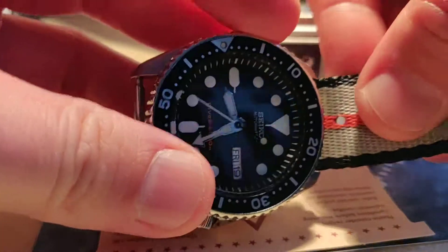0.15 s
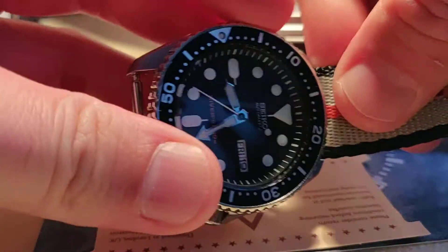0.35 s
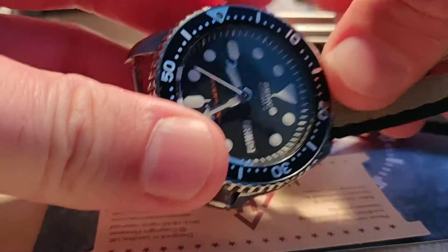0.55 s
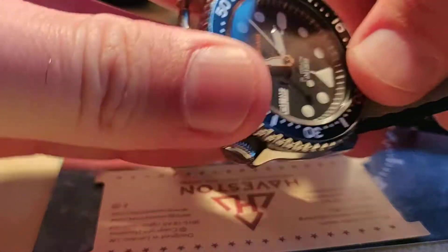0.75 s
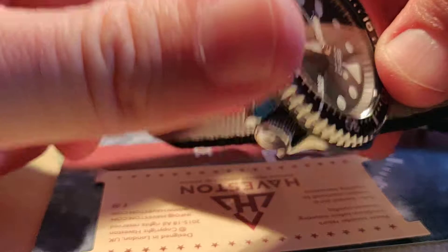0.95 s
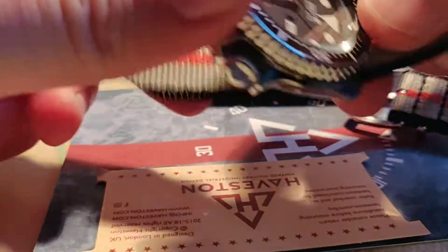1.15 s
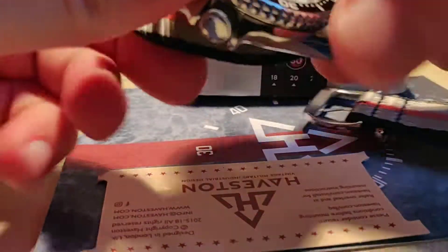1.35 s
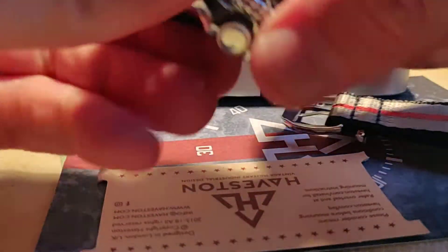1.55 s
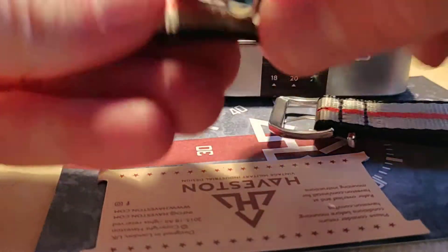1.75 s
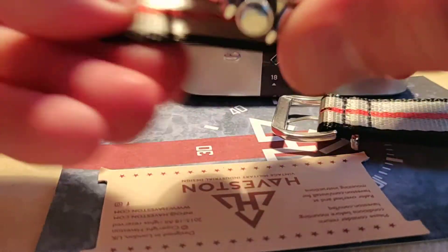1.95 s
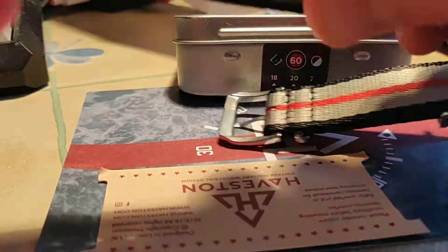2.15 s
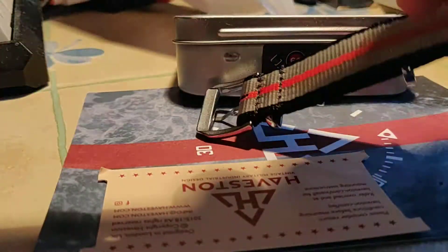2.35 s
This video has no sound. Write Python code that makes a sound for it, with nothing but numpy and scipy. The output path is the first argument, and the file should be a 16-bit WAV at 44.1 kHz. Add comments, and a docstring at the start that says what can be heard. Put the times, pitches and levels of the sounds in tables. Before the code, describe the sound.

A hard hollow metal knock, lighter clacks and finger rubs, then a ribbed fabric strap purring through

```python
"""Steel watch parts snap and knock together in the hands, ringing the case and the hollow of the hands.
Each blow sums decaying modes and a noise crack; finger strokes drive similar modes with trains of tiny slips.
Small fittings tick, the buckle clinks, fingers bump and squeak, and cloth slides as filtered noise.
At the end the ribbed nylon strap is pulled through: its ribs make a low harmonic purr under a hiss.
All is close, with short echoes and a faint tail, over quiet air and a low wavering hum."""
import sys
import numpy as np
from scipy import signal
from scipy.fft import rfft, irfft
from scipy.io import wavfile

SR = 44100
rng = np.random.default_rng(int(sys.argv[2]) if len(sys.argv) > 2 else 0)


def waveform_to_disk(signal):
    """Save audio, clipped to [-1, 1], as 16-bit WAV at the path in sys.argv[1]."""
    frames = np.transpose(np.atleast_2d(signal))
    scaled = np.clip(frames, -1, 1) * 32767
    samples = np.round(scaled).astype(np.int16)
    wavfile.write(sys.argv[1], SR, samples)


N = 110250
T = np.arange(N) / SR  # time (s)

# Quiet air of the room. Each row: frequency in Hz, relative level in dB.
AIR_SPECTRUM = [(20, -12.5), (55, -7.5), (169, -4.5), (313, -6), (741, -13.5), (945, -18.5), (2920, -34.5),
                (6380, -36), (15500, -29)]
AIR_DB, HUM_HZ, HUM_DB = -63, 92.5, -69.5
HUM_WAVER_HZ, HUM_WAVER_RATE_HZ = 2.5, 10  # rms pitch deviation and how fast it wanders

# Cloth sliding over skin and steel. Each row: time in seconds, level in dB.
SLIDE = [(0, -65), (.52, -68), (.538, -53.5), (.56, -63.5), (1.12, -67), (1.24, -57.5), (1.29, -50.5),
         (1.35, -50.5), (1.39, -61.5), (1.5, -72), (1.545, -60.5), (1.58, -72.5), (1.69, -60),
         (1.72, -66.5), (2.0, -69)]
# Spectrum of the sliding weave. Each row: frequency in Hz, relative level in dB.
CLOTH_SPECTRUM = [(200, -5), (850, 0), (2200, 3), (3500, 1), (6600, 1.5), (10000, -7), (15000, 5.5)]
WEAVE_SNAGS_PER_S, SNAG_SPREAD_DB = 450, 3.5  # threads catch and let go
# The strap is pulled through. Each row: time in seconds, ribs per second, purr in dB, hiss in dB.
PULL = [(1.921, 52.6, -70.5, -72.5), (1.972, 65, -57.5, -65.5), (1.997, 116, -50, -63),
        (2.032, 156, -50.5, -53.5), (2.07, 183, -53.5, -55), (2.116, 120, -48.5, -51.5),
        (2.16, 144, -48, -54.5), (2.2, 115, -48, -52), (2.243, 88, -48, -59), (2.281, 125, -48, -56.5),
        (2.355, 104, -48.5, -54.5), (2.386, 56.5, -56.5, -62), (2.422, 125, -47.5, -53.5),
        (2.454, 170, -47, -53), (2.5, 89, -50, -55.5)]
RIB_HARMONICS_DB = [6.5, -0.5, -19.5, -33]  # relative levels from the fundamental upward
RIB_JITTER, RIB_GATING = 0.061, 0.2  # rms share of the rib rate; depth of the hiss modulation
PURR_PAN_DB = 15  # left over right

# Light ticks of buckle and keepers. Each row: start in seconds, level in dB, tilt in dB per octave.
TICKS = [(0.2025, -51, 4), (0.8567, -44.5, 0), (1.4005, -48, 0.5), (2.0445, -45, 2), (2.052, -46, 0),
         (2.0632, -37, -6), (2.1455, -41, -.5), (2.335, -40.5, 6)]
# Spectrum of a tick. Each row: frequency in Hz, relative level in dB.
TICK_SPECTRUM = [(200, -3.5), (900, -10), (2000, 9.5), (3500, 0.5), (6000, 8), (8000, 2), (10500, -10.5),
                 (15000, -2.5)]
TICK_T60_S, TICK_PULSE_DB = 0.014, 8  # pulse peak relative to the rattle

# Knocks on the case. Each row: start in seconds, hollow ring in dB, steel ring in dB, crack in dB,
# hollow pitch in Hz.
KNOCKS = [(0.2324, -5.5, -17.5, -18, 863), (0.327, -43.5, -48.5, -57.5, 808), (0.3849, -47, -55, -59, 785),
          (0.4212, -33, -43.5, -47, 845), (0.6733, -21.5, -50, -34, 846.5), (0.7269, -26.5, -46, -39, 837),
          (0.7804, -44, -55, -53, 895), (0.818, -39.5, -59, -52.5, 924), (0.9045, -25.5, -46.5, -46, 859),
          (0.9610, -32, -49.5, -48, 898), (1.0945, -37.5, -51.5, -59, 796), (1.4004, -53, -75, -53.5, 888),
          (2.0630, -43, -45.5, -66, 903)]
# Modes of the steel case. Each row: frequency in Hz, relative level in dB, left minus right in dB.
STEEL_MODES = [(1245, 2, -4), (1610, -1, -2), (1770, 4, -2), (1896, -4, 0), (2158, 0, 3), (2250, -3, 2),
               (2573, -3, 0), (2905, -4, 0), (3255, -2, -6), (3920, -5, 0), (4255, -5, 0), (5405, -7, 5),
               (6130, -6, 3), (6612, -9, 0), (8300, -10.5, -14)]
STEEL_T60_S, STEEL_DAMPING = 0.068, 0.3  # t60 of the lowest mode; exponent of its fall with frequency
STEEL_WAVER, STEEL_WAVER_HZ = 0.008, 150  # rms share of the pitch; how fast it wanders
STRIKE_SPREAD_DB = 1.2  # chance in each mode's level
HOLLOW_RISE_S, HOLLOW_SHAPE = 0.0038, 2.3  # time to the peak; exponent that narrows the pulse
HOLLOW_SAG, HOLLOW_SETTLE_S = 0.11, 0.0039  # the hollow starts flat and settles on its pitch
# The longer, weaker ring of the hollow, relative to the main pulse.
AFTER_HZ, AFTER_DB, AFTER_T60_S, AFTER_RISE_S = 902, -7.5, 0.089, 0.012
# The hollow keeps fluttering as the parts settle.
FLUTTER_DB, FLUTTER_T60_S, FLUTTER_WIDTH_HZ = -28.5, 0.2, 100
# Side modes of the hollow. Each row: frequency in Hz, relative level in dB, t60 in seconds.
SIDE_MODES = [(675, -17, 0.056), (1168, -21.5, 0.092)]
# Spectrum of the crack. Each row: frequency in Hz, relative level in dB.
CRACK_SPECTRUM = [(60, -24), (260, 1), (560, -9), (850, 11), (1500, -0.5), (2100, 3.5), (4400, -1),
                  (6000, -6.5), (10000, -15), (15000, -4)]
CRACK_T60_S = 0.061
RATTLE_DB, RATTLE_GRAIN_DB = -23, 4  # level relative to the crack; rms unevenness
SOFT_TILT, SOFT_STEEL_TILT = 0.079, 0.32  # softer blows are duller (dB per octave for each dB)

# Finger strokes on the metal. Each row: start in seconds, length in seconds, hollow ring in dB,
# scrape in dB, hollow pitch in Hz; levels hold before the stroke's swell.
RUBS = [(0.531, 0.094, -47, -65.5, 835), (0.694, 0.046, -43, -61.5, 863), (0.787, 0.11, -51.5, -64, 822),
        (1.083, 0.041, -46.5, -69, 837), (1.147, 0.076, -46, -66.5, 846), (1.262, 0.068, -40.5, -60.5, 807),
        (1.309, 0.074, -46.5, -57, 766)]
RUB_WIDTH_HZ, SLIPS_PER_S, SLIP_SPREAD_DB = 117, 900, 1.5
RUB_STEEL_DB, RUB_SIDE_DB = -1.5, -10  # steel relative to the scrape; side modes to the hollow
RUB_STEEL_TILT_DB = -0.5  # rubbing wakes the high modes less (dB per octave)
STROKE_SHAPE = 0.61  # exponent of the half-sine swell

# Clinks of the loose buckle. Each row: start in seconds, frequency in Hz, level in dB.
CLINKS = [(0.6735, 4760, -41), (0.674, 1310, -42.5), (0.728, 1237, -41.5), (0.906, 1820, -45.5),
          (1.401, 2200, -60), (2.185, 2355, -50.5)]
CLINK_T60_S = 0.053

# Soft bumps of the fingers. Each row: start in seconds, level in dB before the swell, length in seconds.
BUMPS = [(0.842, -53.5, 0.042), (1.341, -64.5, 0.25), (2.042, -48.5, 0.04), (2.121, -49, 0.048)]
# Dull spectrum of bumps and of the purr's buzz. Each row: frequency in Hz, relative level in dB.
DULL_SPECTRUM = [(130, -3), (300, 4), (550, -7), (900, -4.5), (1500, -31)]

# Squeak as the fingers rub. Each row: time in seconds, top pitch in Hz, level in dB.
SQUEAK = [(1.262, 8150, -78), (1.289, 8420, -63), (1.328, 8680, -64.5), (1.351, 8300, -67),
          (1.372, 7800, -85)]
# Partials of the squeak. Each row: share of the top pitch as a ratio, relative level in dB.
SQUEAK_PARTIALS = [(1, -6), (0.68, -3), (0.51, -2), (0.41, -4.5), (.385, -2)]
SQUEAK_WIDTH_HZ, SQUEAK_PAN_DB = 65, -5.5

# A hiss that swells steeply with the speed of the strap; its level is that at full speed.
ZIP_HZ, ZIP_WIDTH_HZ, ZIP_DB, ZIP_POWER = 6250, 800, -63.5, 3.7

# Decay of the late tail. Each row: frequency in Hz, t60 in seconds.
TAIL_T60 = [(200, .3), (900, 0.26), (3000, 0.24), (7000, 0.35), (15000, 0.52)]
TAIL_DB, EARLY_DB, EARLY_T60_S = -18, -10, 0.06
# Colour of the two microphone ports. Each row: frequency in Hz, left in dB, right in dB.
PORTS = [(1000, 0, 0), (2150, 2, -2.5), (3200, -5, 0), (5100, -1, -3.5), (6730, 3, -4), (8300, -4, 3.5),
         (9800, -3.5, -1.5), (15400, -11.5, -11.5)]
EDGE_HZ = 15900  # band limit


def amp(db):
    """Logarithmic level: decibels to amplitude gain."""
    return 10 ** (np.asarray(db) / 20)


def evened(x):
    """Normalisation: scales to an rms of one."""
    return x / np.sqrt(np.mean(x ** 2) + 1e-20)


def pan(db):
    """Level-difference panning: left and right gains."""
    return amp(np.array([[db / 2], [-db / 2]]))


def read(points, hz):
    """Interpolation of a table on a log-frequency axis."""
    f, value = np.transpose(points)
    return np.interp(np.log(hz + 1), np.log(f), value)


def colour(x, points, tilt_db=0):
    """Minimum-phase filtering with a given spectrum, tilted per octave about 4 kHz."""
    hz = abs(np.fft.fftfreq(4096, 1 / SR))
    tilt = tilt_db * np.log2(np.maximum(hz, 800) / 4000)
    log_gain = np.log(amp(read(points, hz) + tilt))
    # The Hilbert transform of the log gain supplies the phase of a causal filter.
    response = np.exp(np.conj(signal.hilbert(log_gain)))
    taps = np.fft.ifft(response).real[:2048]
    return signal.fftconvolve(x, taps[None], axes=1)[:, :x.shape[1]]


def add(mix, s, sound):
    """Superposition: mixes a sound in at a time in seconds."""
    part = mix[:, max(round(s * SR), 0):][:, :sound.shape[1]]
    part += sound[:, :part.shape[1]]


def drift(hz, size=N):
    """Slow random wander: white noise under a Gaussian low-pass."""
    spectrum = rfft(rng.standard_normal(size))
    low_pass = np.exp(-(np.fft.rfftfreq(size, 1 / SR) / hz) ** 2)
    return evened(irfft(spectrum * low_pass, size))


def noise(points, size=N, tilt_db=0):
    """Coloured noise, uncorrelated in the two ports."""
    return evened(colour(rng.standard_normal((2, size)), points, tilt_db))


def slips(per_s, spread_db):
    """Stick-slip friction as random impulses of uneven size and either sign."""
    sizes = amp(spread_db * np.minimum(rng.exponential(1, N), 4))
    signs = rng.choice([-1, 1], N)
    return sizes * signs * (rng.random(N) < per_s / SR)


def fuzzy(turn, width_hz):
    """Narrow-band noise: two random envelopes in quadrature follow a phase curve."""
    in_phase = drift(width_hz, size=len(turn)) * np.cos(turn)
    quadrature = drift(width_hz, size=len(turn)) * np.sin(turn)
    return in_phase + quadrature


def room_tone(shared=0.26):
    """Partly correlated noise is the air; frequency modulation makes the low hum waver."""
    air = noise(AIR_SPECTRUM)
    air = evened(air + shared * air[::-1])
    pitch = HUM_HZ + HUM_WAVER_HZ * drift(HUM_WAVER_RATE_HZ)
    hum = evened(np.sin(2 * np.pi * np.cumsum(pitch) / SR))
    return amp(AIR_DB) * air + amp(HUM_DB) * hum * pan(2)


def strap(grit_share=0.73, jitter_hz=60, patchy_db=2, patch_hz=60, uneven_db=2, uneven_hz=45, buzz_db=-12):
    """Friction makes the weave hiss; periodic passage of uneven ribs over the bar makes it purr."""
    s, rate, purr_db, hiss_db = np.transpose(PULL)
    rib_rate = np.interp(T, s, rate) * (1 + RIB_JITTER * drift(jitter_hz))
    turn = 2 * np.pi * np.cumsum(rib_rate) / SR
    ribs = 0
    for k, db in enumerate(RIB_HARMONICS_DB):
        ribs = ribs + amp(db + uneven_db * drift(uneven_hz)) * np.cos((k + 1) * turn)
    purr = evened(ribs) * amp([[0], [-PURR_PAN_DB]]) + amp(buzz_db) * noise(DULL_SPECTRUM)
    purr = purr * amp(np.interp(T, s, purr_db, left=-120))
    snags = np.array([slips(WEAVE_SNAGS_PER_S, SNAG_SPREAD_DB) for port in range(2)])
    grit = evened(colour(snags, CLOTH_SPECTRUM))
    weave = evened(noise(CLOTH_SPECTRUM) + grit_share * grit)
    pulled = amp(np.interp(T, s, hiss_db, left=-120) + patchy_db * drift(patch_hz))
    pulled = pulled * (1 + RIB_GATING * np.cos(turn))
    sliding = amp(np.interp(T, *np.transpose(SLIDE)))
    return purr + weave * (pulled + sliding)


def ticks():
    """Impulsive contact of small fittings: one sharp pulse and a short noise rattle."""
    out, t = np.zeros((2, N)), T[:SR // 10]
    for s, db, tilt_db in TICKS:
        pulse = colour(np.tile(t == 0, (2, 1)) * 1., TICK_SPECTRUM, tilt_db)
        pulse = amp(TICK_PULSE_DB) * pulse / abs(pulse).max()
        rattle = noise(TICK_SPECTRUM, size=len(t), tilt_db=tilt_db) * amp(-60 * t / TICK_T60_S)
        add(out, s, amp(db) * (rattle - pulse))
    return out


def steel_ring(t, tilt_db):
    """Modal decay: higher modes die sooner, and the grip of the fingers makes each one waver."""
    out, lowest = 0, STEEL_MODES[0][0]
    for (hz, db, side), chance in zip(STEEL_MODES, rng.standard_normal(len(STEEL_MODES))):
        t60 = STEEL_T60_S * (lowest / hz) ** STEEL_DAMPING
        start_db = db + tilt_db * np.log2(hz / lowest) + STRIKE_SPREAD_DB * chance
        level = amp(start_db - 60 * t / t60)
        pitch = hz * (1 + STEEL_WAVER * drift(STEEL_WAVER_HZ, size=len(t)))
        cycles = np.cumsum(pitch) / SR + rng.random()
        out = out + pan(side) * level * np.sin(2 * np.pi * cycles)
    return out / 2


def side_ring(t):
    """Cavity side modes: weaker damped sines on both sides of the hollow's pitch."""
    return sum(amp(db - 60 * t / t60) * np.sin(2 * np.pi * hz * t) for hz, db, t60 in SIDE_MODES)


def hollow_ring(t, hz):
    """Cavity resonance: a brief pulse that starts flat, a longer weaker ring and a flutter."""
    lag_s = HOLLOW_SAG * HOLLOW_SETTLE_S * (1 - np.exp(-t / HOLLOW_SETTLE_S))
    u = t / HOLLOW_RISE_S
    pulse = (u * np.exp(1 - u)) ** HOLLOW_SHAPE * np.sin(2 * np.pi * hz * (t - lag_s))
    after_level = amp(AFTER_DB - 60 * t / AFTER_T60_S) * (1 - np.exp(-(t / AFTER_RISE_S) ** 2))
    after = after_level * np.sin(2 * np.pi * AFTER_HZ * (t - lag_s))
    flutter = amp(FLUTTER_DB) * settling(t) * fuzzy(2 * np.pi * hz * t, FLUTTER_WIDTH_HZ)
    return pulse + after + flutter


def settling(t):
    """Exponential decay with a soft onset, as the parts come to rest."""
    return amp(-60 * t / FLUTTER_T60_S) * (1 - np.exp(-t / AFTER_RISE_S))


def knocks(steel_rise_s=0.001):
    """Impact excitation: a crack, steel and hollow modes, and a grainy rattle dying away."""
    out, t = np.zeros((2, N)), T[:SR // 4]
    for s, hollow_db, steel_db, crack_db, hz in KNOCKS:
        softer_db = hollow_db - KNOCKS[0][1]  # relative to the first blow
        grain_db = RATTLE_GRAIN_DB * drift(STEEL_WAVER_HZ, size=len(t))
        rattle = settling(t) * amp(RATTLE_DB + grain_db)
        crack = noise(CRACK_SPECTRUM, size=len(t), tilt_db=SOFT_TILT * softer_db)
        crack = crack * (amp(-60 * t / CRACK_T60_S) + rattle)
        steel = amp(steel_db) * steel_ring(t, SOFT_STEEL_TILT * softer_db)
        modes = (steel - amp(hollow_db) * side_ring(t)) * (1 - np.exp(-t / steel_rise_s))
        add(out, s, modes + amp(crack_db) * crack - amp(hollow_db) * hollow_ring(t, hz))
    return out


def rubs():
    """Stick-slip excitation: strokes of tiny slips drive the hollow and steel by convolution."""
    out, t = np.zeros((2, N)), T[:SR // 10]
    for s, length, hollow_db, scrape_db, hz in RUBS:
        size = int(length * SR)
        grit = slips(SLIPS_PER_S, SLIP_SPREAD_DB)[None, :size + len(t) - 1]
        hollow = t * np.exp(-np.pi * RUB_WIDTH_HZ * t) * np.sin(2 * np.pi * hz * t)
        ring = evened(signal.fftconvolve(grit, hollow[None], "valid"))
        side_modes = evened(signal.fftconvolve(grit, side_ring(t)[None], "valid"))
        ring = ring + amp(RUB_SIDE_DB) * side_modes
        case = steel_ring(t, RUB_STEEL_TILT_DB)
        steel = evened(np.array([signal.fftconvolve(grit[0], side, "valid") for side in case]))
        scrape = evened(colour(grit, CRACK_SPECTRUM)[:, -size:]) + amp(RUB_STEEL_DB) * steel
        stroke = np.sin(np.pi * np.arange(size) / size) ** STROKE_SHAPE
        add(out, s, stroke * (amp(hollow_db) * ring + amp(scrape_db) * scrape))
    return out


def clinks():
    """Single-mode decay: a loose part of the buckle rings with one short note."""
    out, t = np.zeros((2, N)), T[:SR // 10]
    for s, hz, db in CLINKS:
        note = amp(db - 60 * t / CLINK_T60_S) * np.sin(2 * np.pi * hz * t)
        add(out, s, note[None])
    return out


def bumps(bump_pan_db=2):
    """Soft contact: fingers shift their grip with half-sine swells of dull noise."""
    out = np.zeros((2, N))
    for s, db, length in BUMPS:
        size = int(length * SR)
        swell = np.sin(np.pi * np.arange(size) / size)
        thud = noise(DULL_SPECTRUM, size=size)[:1]
        add(out, s, thud * amp(db) * swell * pan(bump_pan_db))
    return out


def squeak():
    """Friction-stirred resonance: thin, wavering partials arch together in pitch."""
    s, hz, db = np.transpose(SQUEAK)
    turn = 2 * np.pi * np.cumsum(np.interp(T, s, hz)) / SR
    whistle = 0
    for share, part_db in SQUEAK_PARTIALS:
        whistle = whistle + amp(part_db) * fuzzy(share * turn, SQUEAK_WIDTH_HZ)
    level = amp(np.interp(T, s, db, left=-120, right=-120))
    return whistle * level * pan(SQUEAK_PAN_DB)


def zip_hiss():
    """Speed-dependent friction: at its fastest the weave sings against the edge of the bar."""
    s, rate = np.transpose(PULL)[:2]
    speed = np.interp(T, s, rate, left=0) / rate.max()
    hiss = fuzzy(2 * np.pi * ZIP_HZ * T, ZIP_WIDTH_HZ)
    return amp(ZIP_DB) * speed ** ZIP_POWER * hiss * pan(PURR_PAN_DB / 2)


def room(x, early_delay_s=0.004, tail_delay_s=0.013):
    """Reflection and reverberation: quick echoes off table and hands, then a faint tail."""
    t = T[:SR // 2]
    early, late = rng.standard_normal((2, 2, len(t)))
    sparse = rng.random(early.shape) < 0.05
    early = evened(early * sparse * (t > early_delay_s) * amp(-60 * t / EARLY_T60_S))
    # Each frequency of the tail decays at its own rate.
    hz, at, z = signal.stft(late, SR, nperseg=256)
    decay = amp(-60 * at / read(TAIL_T60, hz)[:, None])
    late = signal.istft(z * decay, SR, nperseg=256)[1][:, :len(t)]
    late = evened(late * (t > tail_delay_s))
    echoes = (amp(EARLY_DB) * early + amp(TAIL_DB) * late) / np.sqrt(len(t))
    return x + signal.fftconvolve(x, echoes, axes=1)[:, :N]


def scene():
    """Superposition of the handling sounds in the room, filtered by the two ports, over room tone."""
    handling = strap() + ticks() + knocks() + rubs() + clinks() + bumps() + squeak() + zip_hiss()
    near = room(handling)
    hz, left_db, right_db = np.transpose(PORTS)
    left = colour(near[:1], np.column_stack([hz, left_db]))
    right = colour(near[1:], np.column_stack([hz, right_db]))
    return np.vstack([left, right]) + room_tone()


def record(dry):
    """Band limitation by a linear-phase low-pass."""
    low_pass = signal.firwin(511, EDGE_HZ, window=("kaiser", 9), fs=SR)
    return signal.oaconvolve(dry, low_pass[None], "same")


dry = scene()
out = record(dry)
waveform_to_disk(out)
```